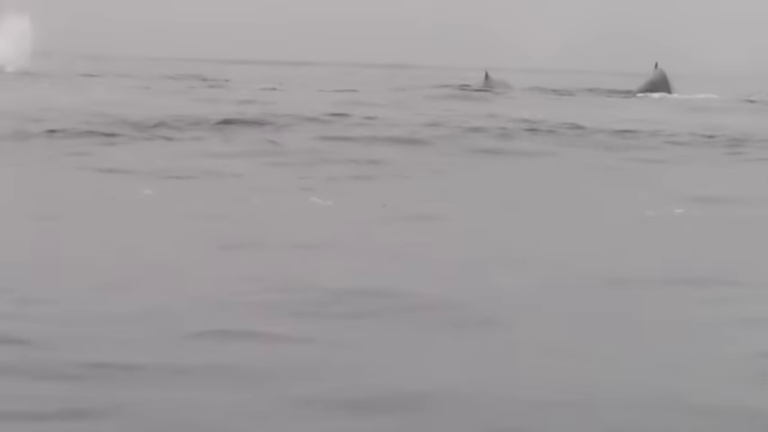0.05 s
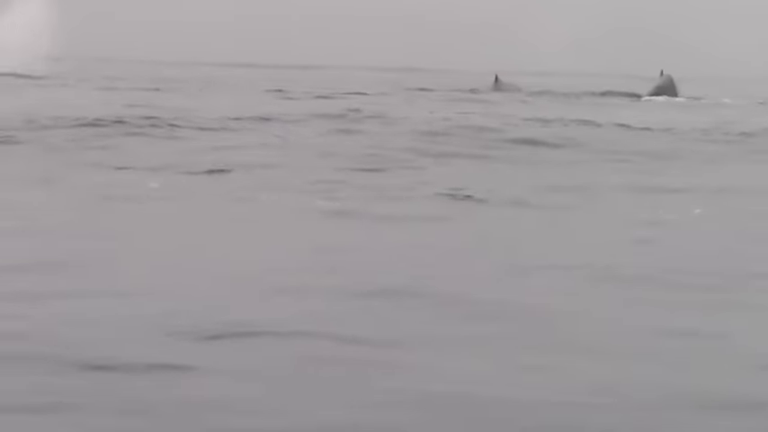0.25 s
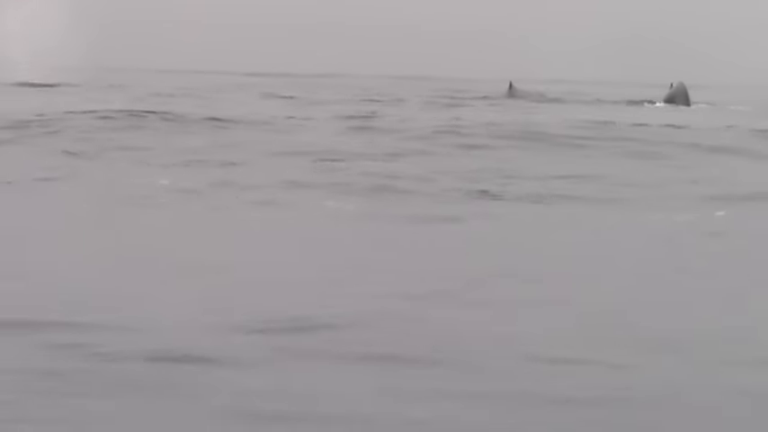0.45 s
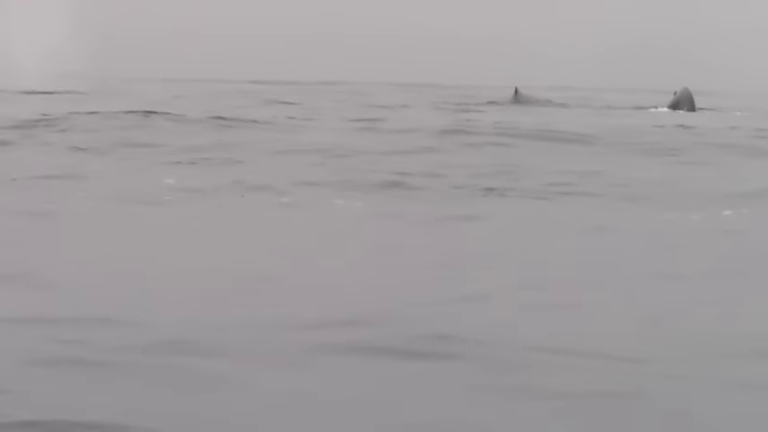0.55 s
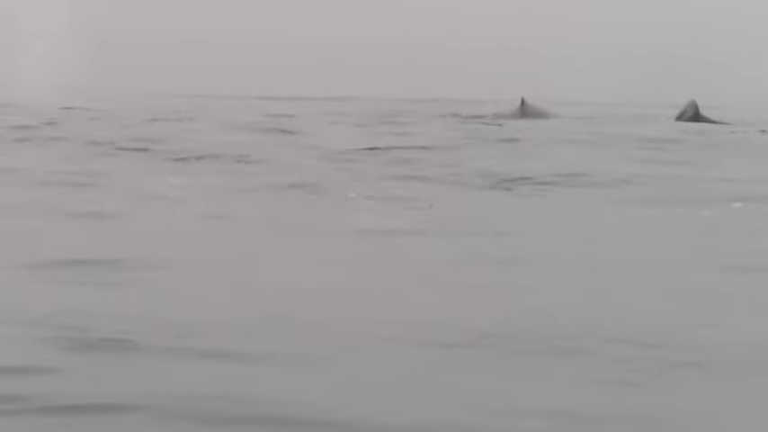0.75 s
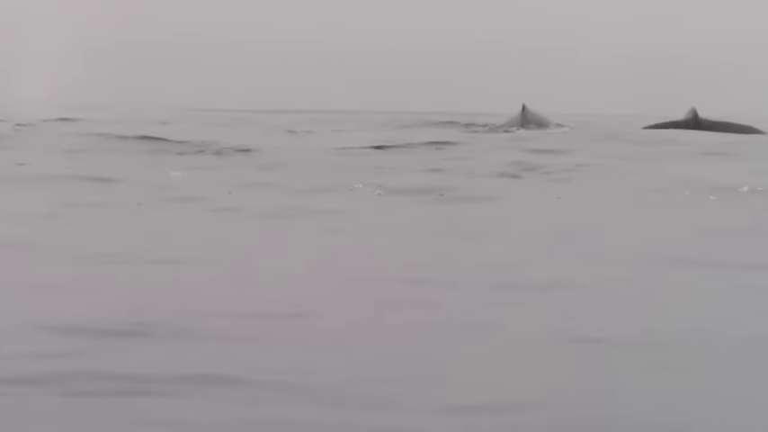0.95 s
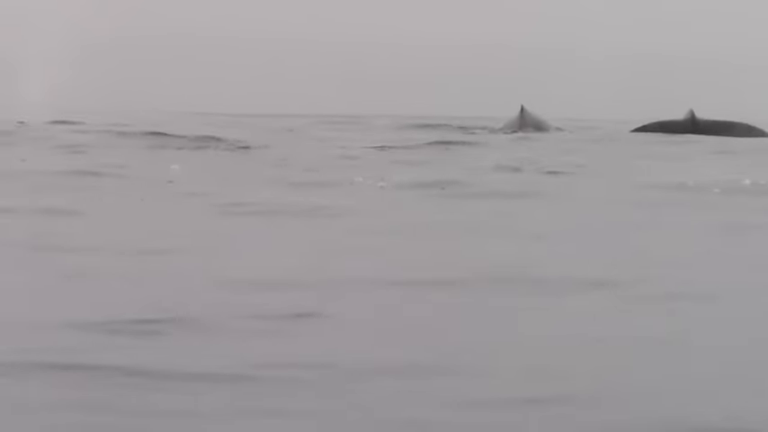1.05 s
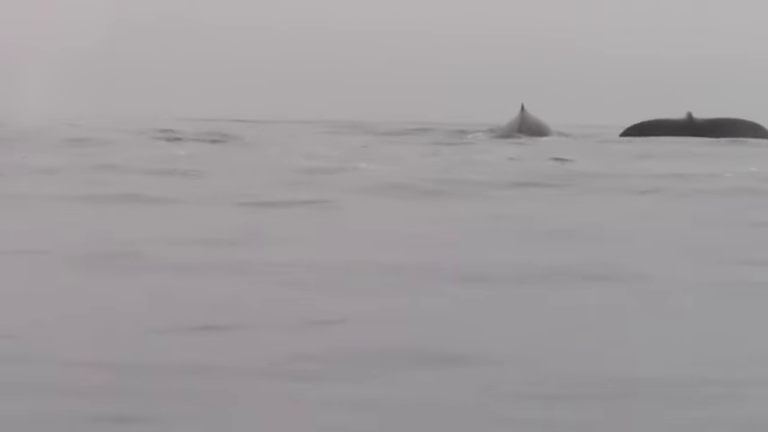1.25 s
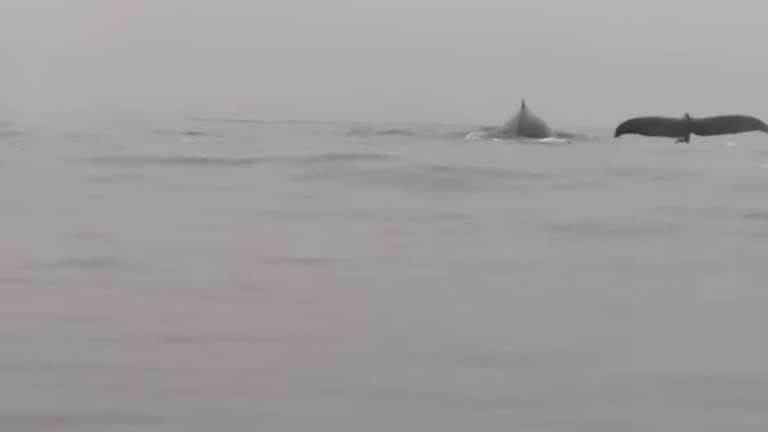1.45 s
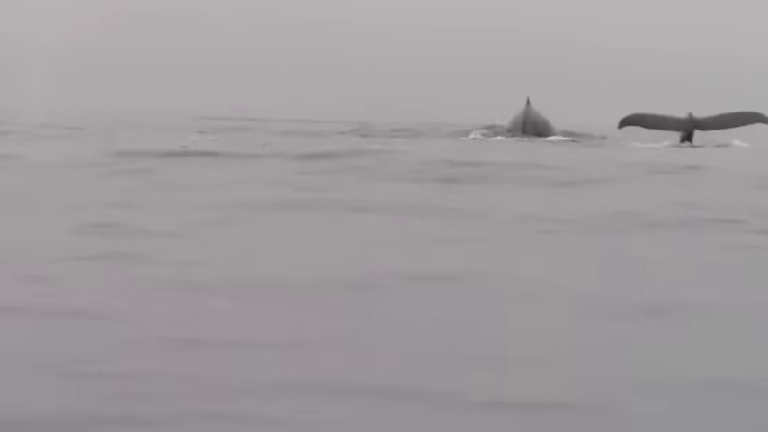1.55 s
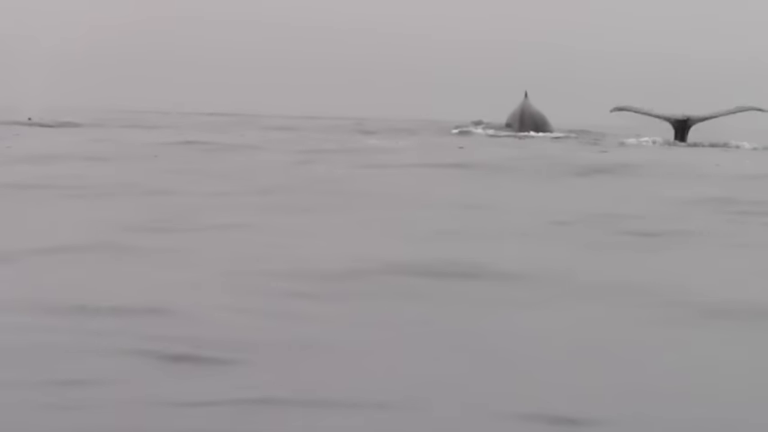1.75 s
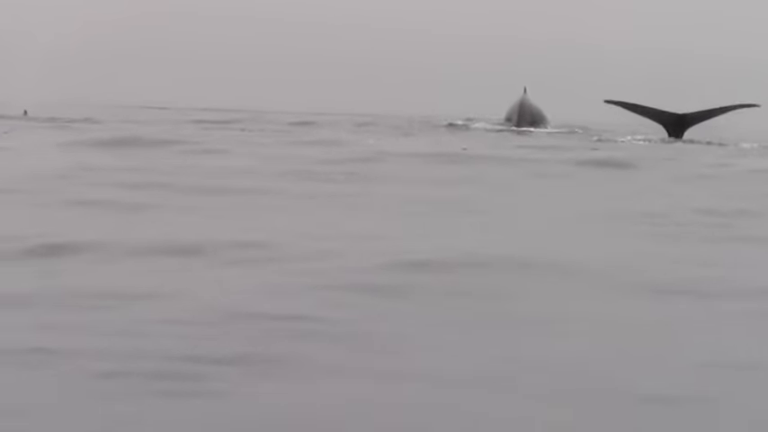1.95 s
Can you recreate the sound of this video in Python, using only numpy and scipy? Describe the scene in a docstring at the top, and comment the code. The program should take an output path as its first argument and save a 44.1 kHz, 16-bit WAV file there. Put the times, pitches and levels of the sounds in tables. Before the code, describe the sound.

A whale blows once nearby, a hollow, sputtering burst of air with hissing spray that trails into a thinner breath. Then drops tick and calm sea laps at a small boat's hull, close to the microphone, over low wind.

```python
"""Calm open sea, a close microphone pair on a small boat, a whale surfacing nearby.
Water washes along the hull over a low rumble of wind. At 0.2 s the whale blows once: air bursts
through the wet blowhole, hollow and sputtering, and the spray hisses. A thinner stream of air
follows, moaning in the airway, and shuts off near 1.15 s. Then drops tick on the water, foam
fizzes on a small wave, and the sea laps at the hull."""
import sys
import numpy as np
from scipy import signal
from scipy.fft import rfft, irfft
from scipy.io import wavfile
from scipy.ndimage import uniform_filter1d

SR = 44100
rng = np.random.default_rng(int(sys.argv[2]) if len(sys.argv) > 2 else 0)


def to_wav(sig):
    """Store sig (one row per channel, or 1-D mono) as 16-bit WAV at the path in sys.argv[1].

    Samples outside -1..1 are clipped; the rate is SR.
    """
    pcm = np.clip(np.atleast_2d(sig), -1, 1) * 32767
    pcm = np.round(pcm).astype(np.int16)
    wavfile.write(sys.argv[1], SR, pcm.T)  # frames by channels


N = 88200
TIME, FREQS = np.arange(N) / SR, np.fft.rfftfreq(N, 1 / SR)

# the blow, near the boat: force of the burst, hiss of the jet, finer mist (t/s, level/dB)
BURST_LEVEL = [(.175, -47), (.195, -46.5), (.235, -36.5), (.29, -29.5), (.35, -29), (.415, -25.5),
               (.465, -28.5), (.495, -24.5), (.515, -30.5), (.60, -36.5), (.68, -52), (.9, -58),
               (1.14, -59)]
JET_LEVEL = [(.18, -92), (.28, -72), (.32, -58), (.44, -41.5), (.465, -44.5), (.492, -41.5), (.525, -46.5),
             (.57, -48), (.68, -53), (.9, -58), (1.1, -69), (1.15, -80)]
MIST_LEVEL = [(.16, -78), (.22, -72), (.32, -68.5), (.44, -66.5), (.52, -58.5), (.58, -65.5), (.7, -71),
              (.9, -73.5), (1.1, -84)]
# spectra of its air and spray (f/Hz, relative level/dB)
BURST_SPECTRUM = [(15, -56), (35, -50), (70, -19), (130, -11), (200, -7.5), (290, -7.5), (420, 1),
                  (560, -2.5), (780, -9.5), (1100, -22), (1600, -18.5), (2100, -26), (2800, -33),
                  (6000, -55), (15000, -77)]
STREAM_SPECTRUM = [(15, -50), (40, -21), (120, -11.5), (190, -2.5), (290, -6), (420, -0.5), (600, 0.5),
                   (800, -9.5), (1300, -5), (2100, -14.5), (2800, -22), (3800, -26), (5000, -33),
                   (6000, -42), (7700, -38.5), (10000, -68), (15000, -64)]
JET_SPECTRUM = [(100, -32), (500, 8), (2000, 5.5), (3000, -6.5), (4500, -0.5), (5300, -9), (6100, -18),
                (7500, -13), (9800, -25), (11500, -34), (15000, -45)]
MIST_SPECTRUM = [(100, -48), (4000, 0), (6000, 2), (7500, 0.5), (9800, -0.5), (11500, -14), (15000, -30)]
# airway resonances (f as the blowhole parts/Hz, f wide open/Hz, width/Hz, lift/dB)
AIRWAY_RESONANCES = [(620, 470, 360, 3), (786, 912, 170, 6.5), (1300, 1613, 87, 6.5), (1950, 2060, 133, 6)]
# water flapping in the blowhole (t/s, relative level/dB, decay/s, f/Hz)
SPUTTER_EVENTS = [(0.2455, -24.8, .017, 570), (.484, -29, 0.017, 540)]
# moans of the airway after the burst and as it closes (t/s, length/s, level/dB, f/Hz, width/Hz)
MOAN_EVENTS = [(0.596, 0.18, -46, 194, 80), (0.715, 0.186, -45.5, 597, 230), (0.91, 0.164, -42, 464, 149),
               (1.056, 0.1, -43.5, 340, 253)]

# wash all around the boat, and the extra gain on its treble (t/s, level/dB)
WASH_LEVEL = [(0, -48), (.12, -47.5), (.3, -49), (1.15, -51.5), (1.25, -51.5), (1.36, -49), (1.5, -48.5),
              (1.58, -46.5), (1.72, -47), (1.84, -45.5), (2, -47)]
WASH_TREBLE_GAIN = [(.1, -5.5), (1.2, 1.5), (1.35, 1), (1.55, 1.5), (2, 0.5)]
# water running along the hull (t/s, length/s, level/dB, f/Hz, width/Hz)
SLOSH_EVENTS = [(0.015, 0.23, -49, 260, 337), (1.507, 0.53, -52.5, 511, 114)]
# laps against the hull (t/s, level/dB, length/s, f/Hz)
LAP_EVENTS = [(1.842, -42, 0.027, 477), (1.858, -40, 0.014, 940)]
# drops landing on the water (t/s, level/dB)
DRIP_EVENTS = [(0.069, -57), (1.4082, -63), (1.421, -56.5), (1.4685, -58.5), (1.4947, -58), (1.4988, -59),
               (1.507, -60)]
# spectra of the water, the wind and the microphones' own hiss (f/Hz, relative level/dB)
WASH_SPECTRUM = [(15, -50), (35, -14.5), (60, -6.5), (170, -1), (280, -6.5), (400, -1), (500, 0),
                 (680, -5.5), (950, -5), (1250, -6), (1700, -8), (2300, -15.5), (3200, -23.5), (4600, -30),
                 (6000, -39.5), (8500, -42), (11500, -51), (15000, -54)]
FOAM_SPECTRUM = [(1000, -18), (3500, 3.5), (7500, -2.5), (10000, -8), (12000, -16), (15000, -32)]
DRIP_SPECTRUM = [(1500, -25), (4000, -8), (5300, 6), (7500, -5), (10000, -10), (14000, -28)]
WIND_SPECTRUM = [(10, -30), (25, -19), (40, -12.5), (75, 4.5), (130, -7), (250, -7.5), (600, -10),
                 (3000, -40.5)]
MIC_HISS_SPECTRUM = [(20, -11), (100, 24.5), (2000, 6.5), (6000, 0.5), (11000, -11.5), (14000, -16),
                     (15500, -10)]

# balance of the microphone pair (f/Hz, left minus right level/dB)
MIC_BALANCE = [(80, -1), (200, -0.2), (310, 1.5), (440, 2), (670, 2), (900, 1), (1500, -0.9), (2700, 1),
               (3600, -3), (4800, -1), (6500, 0), (12000, 0.5)]
# phase lead of the left microphone (f/Hz, phase/rad)
MIC_LEAD = [(60, 0.059), (230, -0.19), (450, -0.12), (750, 0.08), (2000, 0.29), (2900, 0.06), (3250, .25),
            (3900, -0.02), (5500, -0.21), (7000, 0)]
# side signal, the sound the two microphones do not share (f/Hz, relative level/dB)
BLOW_SIDE_GAIN = [(40, -22), (150, -28), (500, -27), (1200, -30), (2200, -44), (3200, -30), (6000, -20),
                  (7500, -41), (12000, -32)]
SEA_SIDE_GAIN = [(40, -23), (120, -28), (280, -10), (500, -17.5), (700, -12), (1900, -24), (3200, -12),
                 (6000, -18), (12000, 0)]


def blow():
    """The rushing air and spray of the whale's breath, from one spot near the boat."""
    return burst() + stream() + spray()


def burst(rise_s=0.016):
    """Air breaks through the wet blowhole and roars in the airway."""
    gate = np.clip((TIME - BURST_LEVEL[0][0]) / rise_s, 0, 1)
    turbulence = flutter(slow_hz=35, fast_hz=220, depth_db=0.8)
    return gate * level(BURST_LEVEL) * steady(airway(noise(BURST_SPECTRUM))) * turbulence


def stream(start_s=0.1783, open_s=0.38, ease_s=1.022, end_s=1.156):
    """An even flow of air brightens as the blowhole opens, dulls as pressure eases, and is shut off."""
    air = steady(airway(noise(STREAM_SPECTRUM))) * flutter(slow_hz=2.1, fast_hz=69.4, depth_db=1.23)
    low = signal.sosfiltfilt(lowpass(2, hz=1670), air)
    until_open = np.clip(open_s - TIME, 0, None)
    since_ease = np.clip(TIME - ease_s, 0, None)
    treble_gain = amp(-62 * until_open - 13 * since_ease)  # slopes in dB/s
    gain = amp(-35.5 - 2.5 * (TIME - start_s) - 81 * since_ease)  # slow sag, then a fast fade
    gate = held(start_s, end_s - start_s, rise_s=0.016, fall_s=0.021)
    return gate * gain * (low + (air - low) * treble_gain)


def airway(air, widen_at_s=0.26, widen_for_s=0.1, waver_hz=18):
    """The soft airway colours the air: its resonances waver, and glide as the blowhole widens."""
    opening = np.clip((TIME - widen_at_s) / widen_for_s, 0, 1)
    out = air
    for parted_hz, open_hz, width_hz, lift_db in AIRWAY_RESONANCES:
        waver = unit(ring(rng.standard_normal(N), waver_hz, 2 * waver_hz))
        hz = (parted_hz + (open_hz - parted_hz) * opening) * (1 + 0.015 * waver)
        out = out + (amp(lift_db) - 1) * gliding_ring(air, hz, width_hz)
    return unit(out)


def spray():
    """The jet hisses at the height of the burst; fine mist follows a moment later."""
    hiss = level(JET_LEVEL) * noise(JET_SPECTRUM) + level(MIST_LEVEL) * noise(MIST_SPECTRUM)
    return hiss * flutter(slow_hz=30, fast_hz=397, depth_db=-0.1)


def push():
    """The first mass of air reaches the microphones as a soft, deep whump."""
    gate = held(start_s=0.188, length_s=0.26, rise_s=0.057, fall_s=0.057)
    return amp(-40.5) * gate * hollow(hz=151, width_hz=97)


def sputters(flap_hz=270.2, width_hz=250, rise_s=0.003):
    """Water flaps in the jet: short runs of uneven pulses in a hollow resonance."""
    out = np.zeros(N)
    for start, db, decay, hz in SPUTTER_EVENTS:
        t = TIME[:round(2 * decay * SR)]
        jitter = unit(uniform_filter1d(rng.standard_normal(N), size=150))[:len(t)]
        cycles = np.cumsum(flap_hz * (1 + 0.263 * jitter)) / SR
        pulses = np.diff(np.floor(cycles), prepend=-1) + 0.036 * rng.standard_normal(N)[:len(t)]
        force = (1 - 0.5 * np.exp(-t / rise_s)) * np.exp(-(t / decay) ** 2)
        flap = ring(ring(pulses * force, hz, width_hz), hz, 2 * width_hz)
        add(out, start, amp(db) * unit(flap) / np.sqrt(2))
    return signal.sosfilt(lowpass(2, hz=1530), out)


def moans():
    """The airway resounds hollowly as the flow slackens."""
    out = np.zeros(N)
    for start, length, db, hz, width_hz in MOAN_EVENTS:
        gate = held(start, length, rise_s=0.014, fall_s=0.024)
        out += amp(db) * gate * steady(hollow(hz, width_hz))
    return out


def laps():
    """Small waves gulp against the hull, close by: a quick swell and a slower fall."""
    out = np.zeros(N)
    for start, db, length, hz in LAP_EVENTS:
        gulp = unit(signal.sosfilt(lowpass(2, hz=2000), hollow(hz, 0.6 * hz)))
        progress = np.clip((TIME - start) / length, 0, 1)
        out += amp(db) * gulp * np.sin(np.pi * progress ** 0.38) ** 2
    return out


def sloshes():
    """Water runs along the hull, which booms faintly with it."""
    out = np.zeros(N)
    for start, length, db, hz, width_hz in SLOSH_EVENTS:
        water = hollow(hz, width_hz)
        hull = amp(-14) * hollow(hz=154, width_hz=110)
        out += amp(db) * held(start, length, rise_s=0.028, fall_s=0.028) * (water + hull)
    return out


def drips(tick_decay_s=0.0007, splash_decay_s=0.005):
    """Drops tick sharply on the water by the boat, each with a tiny splash."""
    drop = np.exp(-TIME / tick_decay_s) + amp(-12) * np.exp(-TIME / splash_decay_s)
    envelope = np.zeros(N)
    for start, db in DRIP_EVENTS:
        add(envelope, start, amp(db) * drop)
    return envelope * noise(DRIP_SPECTRUM)


def sea():
    """The open-water ambience on all sides of the microphones."""
    return wash() + wind() + foam()


def wash():
    """Water washes around the boat: dull, brightening during the blow, then swelling on a small wave."""
    water = level(WASH_LEVEL) * noise(WASH_SPECTRUM) * flutter(slow_hz=34, fast_hz=150, depth_db=-0.1)
    low = signal.sosfiltfilt(lowpass(3, hz=1930), water)
    return low + (water - low) * level(WASH_TREBLE_GAIN)


def wind():
    """Wind rumbles low and unevenly under everything."""
    return amp(-61.5) * noise(WIND_SPECTRUM) * flutter(slow_hz=3, fast_hz=21, depth_db=2.5)


def foam(peak_s=1.56, width_s=0.13):
    """A patch of foam fizzes faintly on the small wave."""
    swell = amp(-69.5) * np.exp(-((TIME - peak_s) / width_s) ** 2 / 2)
    return swell * noise(FOAM_SPECTRUM) * flutter(slow_hz=40, fast_hz=700, depth_db=2.5)


def amp(db):
    """Decibels to gain."""
    return 10 ** (np.asarray(db) / 20)


def unit(x):
    """Scales to an rms of one."""
    return x / np.sqrt(np.mean(x ** 2) + 1e-20)


def over_freqs(points):
    """Spreads a curve over FREQS on a log-frequency axis."""
    hz, value = np.transpose(points)
    return np.interp(np.log(FREQS + 1), np.log(hz + 1), value)


def level(points):
    """Gain over time from a level curve."""
    times, db = np.transpose(points)
    return amp(np.interp(TIME, times, db))


def held(start_s, length_s, rise_s, fall_s):
    """Attack, hold and release."""
    return np.clip((TIME - start_s) / rise_s, 0, 1) * np.clip((start_s + length_s - TIME) / fall_s, 0, 1)


def add(mix, start_s, sound):
    """Mixes a sound in at a time."""
    part = mix[max(round(start_s * SR), 0):][:len(sound)]
    part += sound[:len(part)]


def random_phase(magnitudes):
    """Noise with these magnitudes over FREQS, at an rms of one."""
    return unit(irfft(magnitudes * np.exp(2j * np.pi * rng.random(len(FREQS))), N))


def noise(spectrum):
    """Noise coloured by a spectrum table."""
    return random_phase(amp(over_freqs(spectrum)))


def flutter(slow_hz, fast_hz, depth_db):
    """Random swings of gain between two rates."""
    above_slow = (FREQS / slow_hz) ** 2 / (1 + (FREQS / slow_hz) ** 2)
    band = above_slow / (1 + (FREQS / fast_hz) ** 2) ** 2
    return unit(amp(depth_db * random_phase(band)))


def steady(x):
    """Evens out the chance swells of a noise, as in a flow under firm pressure."""
    power = uniform_filter1d(uniform_filter1d(x ** 2, size=600), size=600)
    return unit(x / (abs(power) + 1e-9) ** 0.4)


def lowpass(order, hz):
    """Filter sections for a treble cut."""
    return signal.butter(order, hz, fs=SR, output="sos")


def ring(x, hz, width_hz):
    """One broad resonance."""
    b, a = signal.iirpeak(hz, hz / width_hz, fs=SR)
    return signal.lfilter(b, a, x)


def gliding_ring(x, hz, width_hz):
    """A resonance of gain one that follows a frequency curve."""
    carrier = np.exp(2j * np.pi * np.cumsum(hz) / SR)
    pole = np.exp(-np.pi * width_hz / SR)
    return 2 * (carrier * signal.lfilter([1 - pole], [1, -pole], x / carrier)).real


def hollow(hz, width_hz):
    """Noise in one steep-sided resonance, made of two wider ones in series."""
    once = ring(rng.standard_normal(N), hz, 1.37 * width_hz)
    return unit(ring(once, hz, 1.37 * width_hz))


def scene():
    """At the microphone pair the blow arrives nearly alike, the sea more diffuse."""
    mid = rfft(blow() + push() + sputters() + moans() + sea() + sloshes() + laps() + drips())
    # fresh noise from the same sources gives the stereo width
    side = rfft(blow()) * amp(over_freqs(BLOW_SIDE_GAIN))
    side += rfft(sea() + sloshes()) * amp(over_freqs(SEA_SIDE_GAIN))
    lean_left = amp(over_freqs(MIC_BALANCE) / 2) * np.exp(0.5j * over_freqs(MIC_LEAD))
    return irfft(np.array([(mid + side) * lean_left, (mid - side) / lean_left]), N)


def record(dry, low_cut_hz=32, top_hz=15300):
    """Faint hiss from each microphone, a low cut, then the band limit."""
    hiss = amp(-63) * np.array([noise(MIC_HISS_SPECTRUM), noise(MIC_HISS_SPECTRUM)])
    low_cut = signal.butter(3, low_cut_hz, "high", fs=SR, output="sos")
    band_limit = signal.firwin(301, top_hz, window=("kaiser", 9), fs=SR)
    return signal.oaconvolve(signal.sosfilt(low_cut, dry + hiss), band_limit[None], "same")


dry = scene()
out = record(dry)
to_wav(out)
```